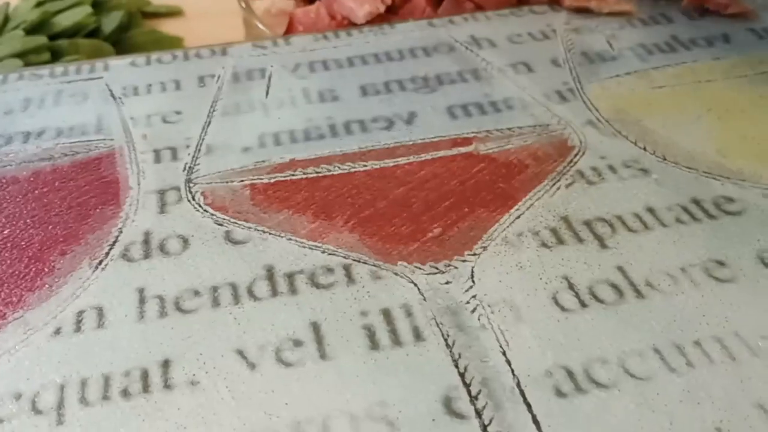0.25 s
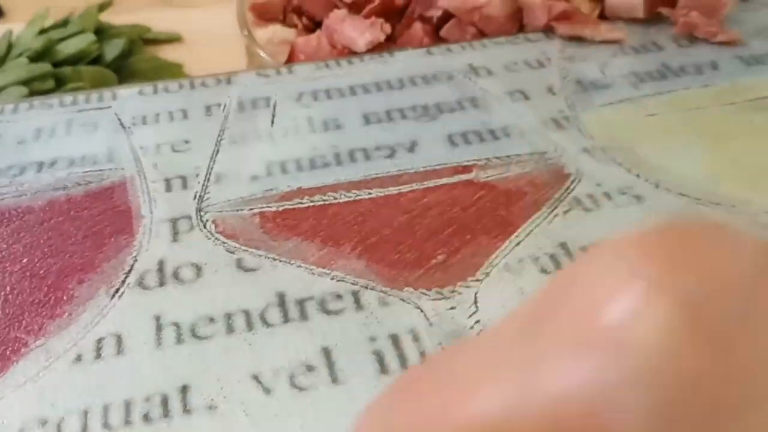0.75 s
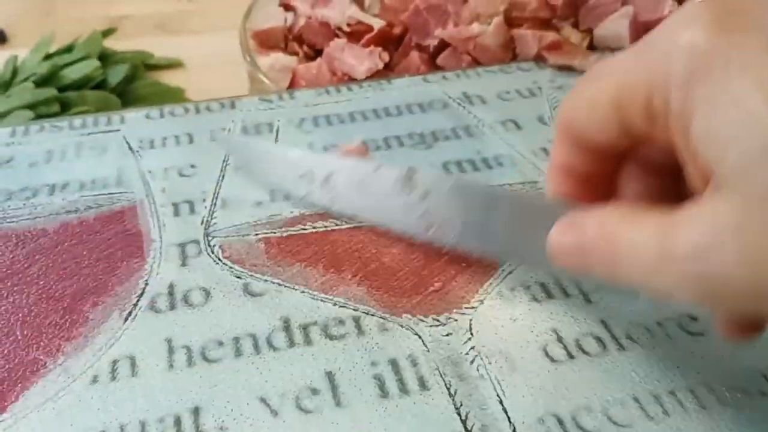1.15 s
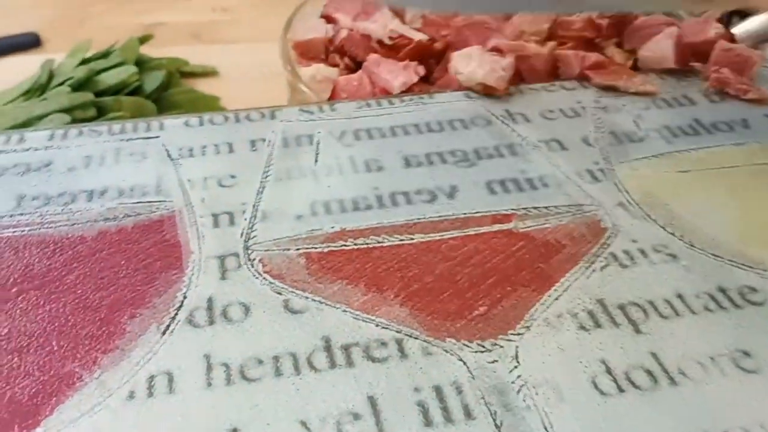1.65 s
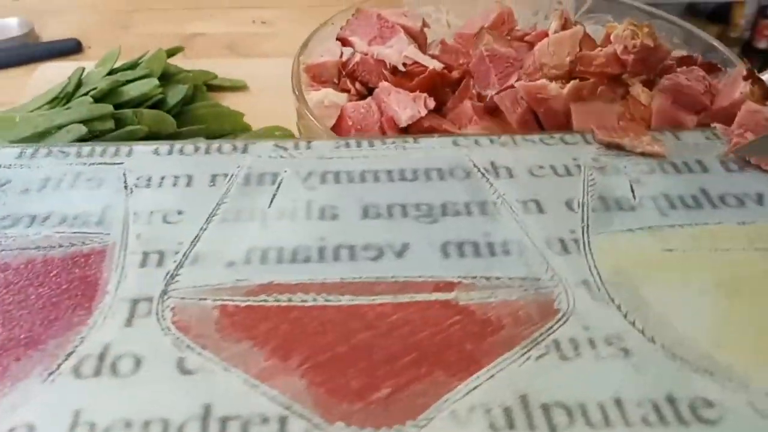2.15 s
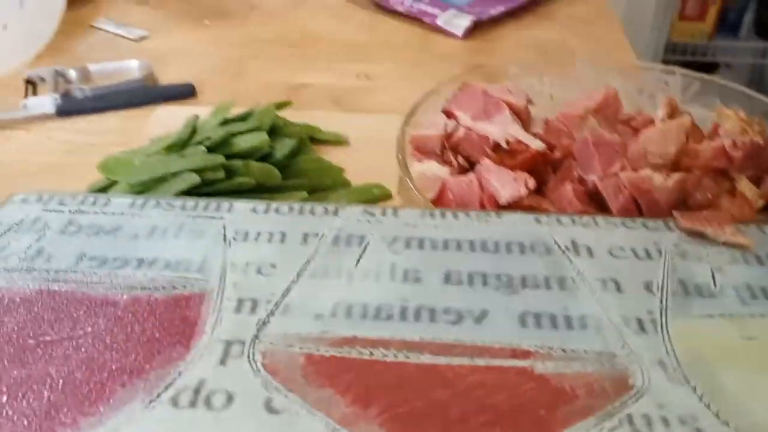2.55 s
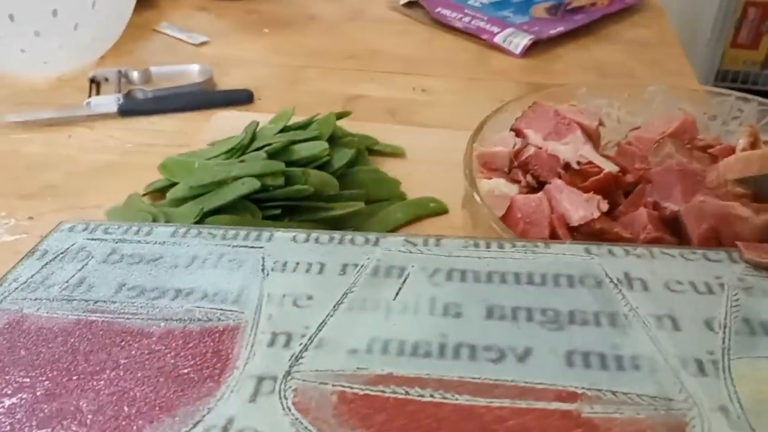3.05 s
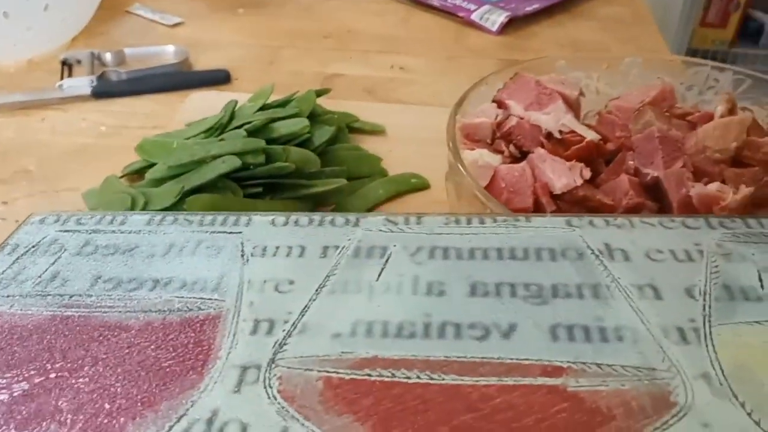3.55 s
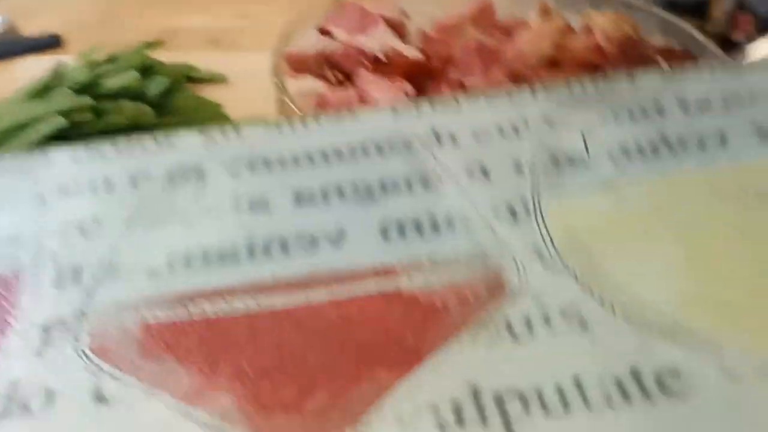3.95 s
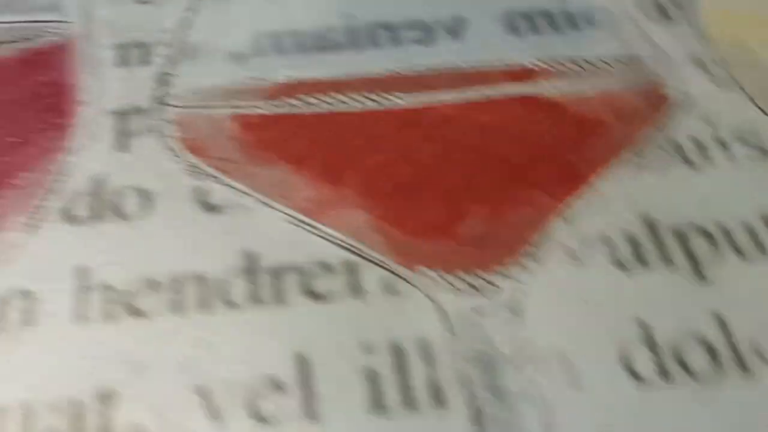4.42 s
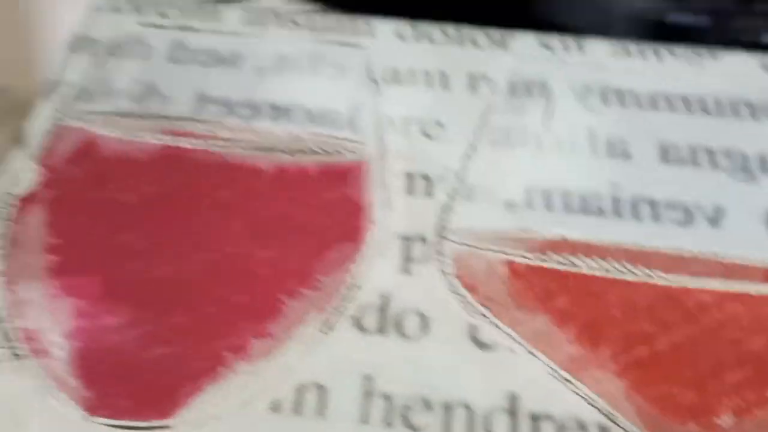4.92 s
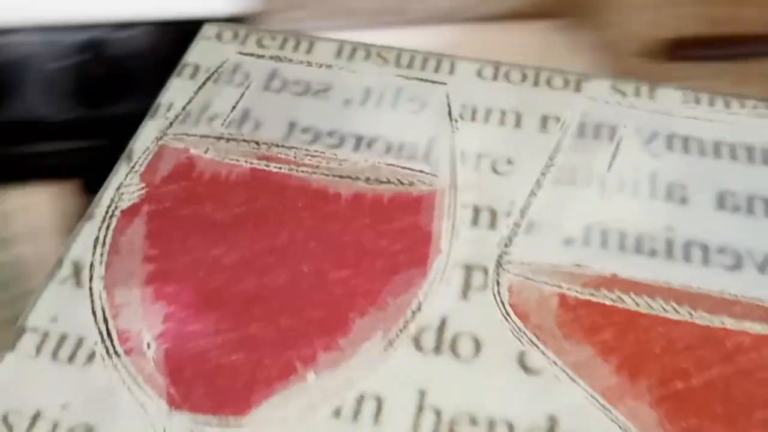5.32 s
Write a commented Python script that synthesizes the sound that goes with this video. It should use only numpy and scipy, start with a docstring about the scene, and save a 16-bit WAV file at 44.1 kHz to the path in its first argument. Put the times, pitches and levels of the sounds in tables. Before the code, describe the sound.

In a quiet kitchen, a knife edge knocks and drags over a bumpy glass cutting board near a phone, ending in a cluster of clicks. After a pause come sharper clattering scrapes and a loud knock, then one last clack. Faint hand rubs and soft hiss remain.

```python
"""A knife blade is dragged over a pebbled glass cutting board, held close to a phone in a quiet kitchen.
Noise bursts at every bump, and short knocks of the edge, drive the glass: a sum of decaying modes and dense noise.
Two faint rubs of the hand follow, made the same way; a mono send into decaying noise gives the brief room answer.
Underneath lie a wavering sine hum, low room rumble and a faint noise hiss that swells as the board is handled.
The phone's two microphone ports hear the board with small lags and level differences."""
import sys
import numpy as np
from scipy import signal
from scipy.fft import rfft, irfft, next_fast_len
from scipy.io import wavfile
from scipy.ndimage import uniform_filter1d, map_coordinates

SR = 44100
rng = np.random.default_rng(int(sys.argv[2]) if len(sys.argv) > 2 else 0)


def write(x):
    x = np.atleast_2d(x).T
    wavfile.write(sys.argv[1], SR, np.round(np.clip(x, -1, 1) * 32767).astype(np.int16))

N = 246078

# Quiet kitchen, breakpoints. Columns: time_s, hiss_db (before a fixed lift), hum_db (before the port gains)
BACKGROUND_LEVELS = [(0.0, -75.5, -80), (0.17, -82.5, -89), (0.37, -77.5, -61.5), (0.46, -83.5, -85),
                     (0.629, -77, -58.5), (0.759, -82.5, -88), (0.888, -79.5, -65.5), (1.95, -79, -73),
                     (2.5, -77, -82), (2.68, -74.5, -85.5), (3.3, -96, -71.5), (3.8, -81, -76.5),
                     (4.2, -96.5, -76), (4.3, -82, -76), (4.56, -85.5, -77), (4.699, -82.5, -68),
                     (4.801, -80, -65), (4.89, -88, -64.5), (5.12, -79, -61.5), (5.19, -84, -77),
                     (5.248, -74, -60), (5.58, -73.5, -57.5)]
# Spectrum of the low room rumble, before scaling to rms 1. Columns: frequency_hz, density_db
RUMBLE_SPECTRUM = [(15, -61.5), (25, -41), (60, -13), (97, -14), (156, -3), (189, -14.5), (220, -7),
                   (327, -10.5), (356, -10), (408, -12), (519, -16.5), (575, -18.5), (1500, -29),
                   (1950, -64.5), (3300, -120)]
# Spectrum of the hiss, before scaling to rms 1. Columns: frequency_hz, density_db
HISS_SPECTRUM = [(710, -30), (1200, -6.5), (1660, -3), (3380, -2), (3930, -4), (4240, -2), (5450, -5.5),
                 (5880, -2.5), (8520, -16.5), (13000, -16), (15000, -9.5), (15700, -8.5), (16200, -28)]
# Left-right likeness of rumble and hiss. Columns: frequency_hz, likeness (1 = same at both ports)
PORT_LIKENESS = [(60, .8), (500, 0.43), (1500, 0), (4000, 0.048)]
# Decay of the room answer. Columns: frequency_hz, t60_s
ROOM_DECAY = [(200, 0.17), (2000, 0.43), (6000, 0.39), (12000, 0.091)]
# Treble fall of the phone microphone. Columns: frequency_hz, gain_db
MICROPHONE_FALL = [(15600, -0.5), (16100, -26), (16800, -30)]
# Path of the blade past the phone. Columns: time_s, right_port_lag_ms, left_minus_right_db
BLADE_PLACE = [(.9, .3, 7.5), (1.1, .12, 3), (1.6, 0.061, -3), (2.7, -.25, 3), (3.3, -.3, 0.5),
               (3.45, -.3, 0), (3.85, .42, 2), (4.5, 0.36, -0.5), (5.5, .42, -0.5)]
# Separate modes of the glass. Columns: frequency_hz, level_db, t60_s (before limiting by the hand)
GLASS_MODES = [(336, -9, 0.14), (434.6, -7, 0.11), (614, -10, 0.23), (696.4, -6.5, 0.54), (795, -13, 0.42),
               (945.3, -10.5, 0.13), (1250, -1, 0.45), (1609, -14.5, 0.1), (2110, -6.5, 0.54),
               (2217, -6.5, 0.12), (2447, -12.5, 0.17), (3070, -11, 0.08), (2745, -5, 0.05),
               (3163, -4, 0.05), (3390, -1, 0.045), (3690, 2.5, 0.3), (4210, 4.5, 0.067),
               (4278, -4.5, 0.36), (4650, -0.5, 0.36), (5046, 1, 0.3), (5300, -2, 0.034), (5764, -1.5, 0.3),
               (5940, 3, 0.036), (6370, -5, 0.15), (6830, -6, .1), (7280, -21, .1), (7590, -12.5, 0.18),
               (9480, -22.5, 0.071), (10350, -31, 0.053), (11220, -27.5, 0.043), (14900, -15, 0.032),
               (15190, -20.5, .05)]
# Longest ring that the holding hand allows. Columns: frequency_hz, t60_s
HAND_DAMPING = [(400, .11), (700, .26), (1300, .24), (1600, .12), (2200, 0.16), (4300, 0.071), (6000, .09),
                (9500, .04)]
# Crowded, quickly damped modes of the glass. Columns: frequency_hz, density_db
CROWDED_MODES = [(150, -52.5), (250, -25.5), (420, -10), (695, -8.5), (1070, -13.5), (1230, -13.5),
                 (1740, -9), (3250, -4.5), (3930, -16), (4280, -4), (5950, -5), (8420, -16), (12800, -25),
                 (14900, -11), (15700, -26.5)]
# Edges in hz between the registers: body, low ring, bright ring, treble, hiss
REGISTER_EDGES_HZ = [0, 1500, 3500, 8000, 13000, 20000]
# Part of the board under each stroke, one row a stroke. Columns: low_ring_db, treble_db (both re bright ring),
# knock_body_db (re body of the rubbing), low_pitch_hz at start, middle, end, high_pitch_hz at start, middle, end
BOARD_SPOTS = [(0.5, -14.5, -10, 720, 570, 940, 2750, 2260, 3300),
               (-1.5, -16.5, -19, 1700, 1200, 1100, 2600, 2500, 2500),
               (2, -13, -14, 820, 770, 300, 1700, 2900, 2550),
               (-4.5, -9.5, -20, 740, 820, 2100, 3000, 3160, 2760),
               (-5, -13, -10, 450, 450, 435, 2480, 2340, 2500),
               (-3.5, -12.5, -13, 445, 550, 310, 2450, 2460, 2340)]
# Knocks and catches of the edge. Columns: start_s, level_db, low_ring_db (re bright ring),
# low_pitch_hz, high_pitch_hz (the two favoured pitches)
EDGE_KNOCKS = [(0.9113, -16.5, -3.5, 720, 2650), (1.4656, -37, -12, 716, 3370),
               (1.481, -11.5, -9.5, 689, 4270), (1.5125, -16, 6.5, 802, 3360),
               (1.5297, -9.5, -22.5, 811, 3285), (1.5404, -16, 6, 797, 3140),
               (1.5486, -19.5, -6.5, 1270, 4280), (1.5588, -14.5, 1.5, 810, 3200),
               (1.5852, -14.5, -2, 1250, 3400), (2.1744, -69, 10, 483, 2300),
               (2.6996, -9, -7.5, 1430, 6230), (2.7557, -21.5, -2.5, 1360, 5840),
               (2.8074, -23.5, -10, 1380, 5800), (2.8449, -9, -11, 1240, 5940),
               (2.8694, -12.5, -10.5, 1270, 4590), (2.8894, -18.5, -21, 1277, 5690),
               (2.9032, -9.5, -22.5, 1320, 5840), (2.9357, -13, -17.5, 1244, 4140),
               (2.9544, -18, -19.5, 690, 4202), (2.9644, -9.5, -20, 1200, 4210),
               (3.0416, -17, -22.5, 1230, 6100), (3.3443, 4, -9, 448, 4310), (3.3584, -10, -17, 1250, 4340),
               (3.3992, -20, -11.5, 1250, 4160), (3.4075, -19, -14, 459, 3690),
               (3.4246, -1, -13.5, 684, 4045), (3.866, -3.5, -11.5, 676, 5426),
               (3.9579, -29.5, -4, 1185, 4930), (4.4664, -59, -3, 401, 3565), (4.6784, -61, 6, 489, 2570),
               (5.4768, -60.5, 10.5, 479, 2700)]
# Strokes of the blade, then two faint rubs of the hand; one list of breakpoints each.
# Columns: time_s, force_db, body_db, edge_hiss_db (the last two re bright ring)
BLADE_STROKES = [
    [(0.918, -29, -1.5, -11), (0.935, -37.5, -5.5, -13), (1.03, -29.5, -10.5, -11.5),
     (1.17, -31.5, -3.5, 0), (1.27, -28.5, -4.5, -14.5), (1.38, -32.5, 1, -21), (1.43, -28, -7.5, -13.5),
     (1.508, -31, -10, -21.5), (1.574, -37.5, 0.5, -29.5)],
    [(2.708, -28.5, -24, -29.5), (2.8, -29, -18.5, -30.5), (2.914, -24.5, -19.5, -24),
     (2.964, -18.5, -19, -22.5), (2.994, -39, -15, -21.5), (3.042, -37.5, -3.5, -25),
     (3.075, -45.5, -8, -19.5)],
    [(3.364, -21.5, -6.5, -24), (3.386, -35, -9.5, -14.5), (3.404, -28.5, -11, -19.5),
     (3.418, -50, -6, -24)],
    [(3.882, -24.5, -8, -18), (3.946, -55, -25.5, -14), (3.96, -17.5, -33, -18), (3.975, -64, -12, -25)],
    [(4.6, -81.5, -15.5, -9), (4.68, -66.5, -23, -13.5), (4.73, -76.5, -33, -7), (4.86, -75.5, -11, -10)],
    [(4.96, -76.5, -17, -12), (5.17, -73, -27, -12), (5.22, -70.5, -10.5, -6.5), (5.31, -78, -23, -10.5),
     (5.39, -62, -37, -12.5), (5.454, -79, -10, -12), (5.49, -70, -10.5, -4), (5.57, -80.5, -10, -13)],
]

HUM_HZ = 160  # centre of the wavering pitch
RUMBLE_DB, RUMBLE_FOLLOWS = -67, 0.14  # mean level; share of the hiss swells that the rumble takes on
HISS_LIFT_DB = 5.0
ROOM_SEND_DB = -14
TOP_HZ = 16800  # band limit of the phone
DETUNE = 0.0067  # the pressing blade shifts each mode by about this share of its pitch
BODY_QUICK_DB = -0.5  # few crowded modes in the lowest register
KNOCK_TREBLE_DB, KNOCK_HISS_DB = -4.5, -8.5  # a knock is duller than the rubbing around it
KNOCK_RISE_S, RATTLE_T60_S = 0.00049, 0.016  # time constant of the rise; decay of the rattle
SCATTER_DB = 1  # typical stray of a knock to the left or right


def amp(db):
    """dB to gain."""
    return 10 ** (np.asarray(db) / 20)


def unit(x):
    """Scaled to rms 1."""
    return x / np.sqrt(np.mean(x ** 2) + 1e-20)


def along(points, hz):
    """Interpolate (frequency_hz, value) points on a log frequency axis."""
    f, v = np.transpose(points)
    return np.interp(np.log(hz + 1), np.log(f + 1), v)


def wobble(rate):
    """A smooth random curve with rate knots a second."""
    knots = rng.standard_normal(int(N * rate / SR) + 4)
    return map_coordinates(knots, [np.arange(N) * rate / SR])


def filtered(x, response):
    """x shaped by a gain that depends on frequency."""
    m = next_fast_len(x.shape[-1] + 8192)
    spectrum = rfft(x, m) * response(np.fft.rfftfreq(m, 1 / SR))
    return irfft(spectrum, m)[..., :x.shape[-1]]


def highpassed(x, order, cutoff_hz):
    """x without the range below cutoff_hz."""
    return signal.sosfilt(signal.butter(order, cutoff_hz, "high", fs=SR, output="sos"), x)


def causal(gain):
    """Minimum-phase impulse response of a gain on the rfft grid."""
    cepstrum = irfft(np.log(gain + 1e-6))
    half = len(cepstrum) // 2
    cepstrum[1:half] *= 2
    cepstrum[half + 1:] = 0
    return irfft(np.exp(rfft(cepstrum)))


def add(out, at, sound):
    """Mix a stereo sound in from sample at."""
    out[:, at:at + sound.shape[1]] += sound


def rush(spectrum):
    """Stereo noise of rms 1 with a given spectrum, most alike at the two ports in the bass."""
    def mid_side(hz):
        angle = np.arccos(np.clip(along(PORT_LIKENESS, hz), -1, 1)) / 2
        return amp(along(spectrum, hz)) * [np.cos(angle), np.sin(angle)]

    mid, side = filtered(rng.standard_normal((2, N)), mid_side)
    return unit(np.array([mid + side, mid - side]))


def hum(hum_db):
    """A sine of wavering pitch and level, in phase at the two ports, a little louder at the left."""
    pitch_hz = HUM_HZ + 11 * wobble(20)
    tone = np.sqrt(2) * np.sin(2 * np.pi * np.cumsum(pitch_hz) / SR)
    return amp(hum_db + 2.2 * wobble(22) + 3 * wobble(2.7)) * tone * amp(0) * np.array(amp([[.4], [-.4]]))


def rumble(hiss_db):
    """Low room noise of unsteady level, which follows the swells of the hiss a little."""
    swell_db = RUMBLE_FOLLOWS * (hiss_db - hiss_db.mean())
    level_db = RUMBLE_DB + swell_db + 2.4 * wobble(14) + 0.58 * wobble(13)
    return amp(level_db) * rush(RUMBLE_SPECTRUM)


def hiss(hiss_db):
    """Shaped noise that swells as the board is handled."""
    return amp(hiss_db + HISS_LIFT_DB + .8 * wobble(32)) * rush(HISS_SPECTRUM)


def background():
    """The quiet kitchen: hum and hiss have level curves of their own, rumble leans on that of the hiss."""
    s, *levels_db = np.transpose(BACKGROUND_LEVELS)
    hiss_db, hum_db = [np.interp(np.arange(N) / SR, s, curve) for curve in levels_db]
    return hum(hum_db) + rumble(hiss_db) + hiss(hiss_db)


def kitchen(x):
    """The room's answer is noise in which each frequency dies at its own speed."""
    hz, t, z = signal.stft(rng.standard_normal((2, SR * 3 // 4)), SR, nperseg=256)
    decay = amp(-60 * t / along(ROOM_DECAY, hz)[:, None])
    tail = signal.istft(z * decay, SR, nperseg=256)[1]
    send = np.pad(x.mean(axis=0), (300, 0))[None]  # the answer comes 300 samples late
    return signal.fftconvolve(send, tail / np.linalg.norm(tail[0]), axes=1)[:, :N]


def ports(length):
    """Noise of rms 1 at the two ports: they agree on the long waves and drift apart in the short ones."""
    shared, other = rng.standard_normal((2, length))
    apart = highpassed(other, 1, 1500)
    return unit(np.array([shared - .45 * apart, shared + .45 * apart]))


def favour_db(hz, low_hz, high_hz):
    """The spot under the blade favours the modes near two pitches."""
    low_peak = 13 / (1 + ((hz / low_hz - 1) / 0.15) ** 2)
    high_peak = 10 / (1 + ((hz / high_hz - 1) / .05) ** 2)
    return low_peak + high_peak


def ringing_modes(t, late, low_hz, high_hz):
    """Decaying sines of the glass, driven unevenly, each shaped (port, mode, time)."""
    hz, db, t60 = np.transpose(GLASS_MODES)[:, :, None]
    t60 = np.clip(t60, .02, along(HAND_DAMPING, hz))
    drive_db = favour_db(hz, low_hz, high_hz) + rng.normal(0, 4.5, db.shape)
    # each mode reaches the two ports from its own part of the plate
    lag = np.maximum([[[-late]], [[late]]], 0) + rng.uniform(0, 0.00026, (2, len(hz), 1))
    turns = 2 * np.pi * hz * (1 + DETUNE * rng.standard_normal(hz.shape)) * (t - lag)
    # a long ring starts lower, so that t60 leaves the energy of a mode alone
    envelope = amp(np.float32(db + drive_db - 10 * np.log10(t60) - 60 * t / t60))
    return hz[:, 0], envelope * np.sin(np.float32(turns)) * (turns > 0)


def board(s, body_db, low_db, treble_db, hiss_db, stray_db, low_hz, high_hz, ring_share):
    """Stereo answer of the glass to a unit blow: ringing and crowded modes, levelled register by register."""
    t = np.arange(SR // 5) / SR
    f = np.fft.rfftfreq(len(t), 1 / SR)
    at, lag_ms, place_db = np.transpose(BLADE_PLACE)
    late = np.interp(s, at, lag_ms) / 1000
    pan_db = stray_db + np.interp(s, at, place_db)
    mode_hz, modes = ringing_modes(t, late, low_hz, high_hz)
    crowd = amp(along(CROWDED_MODES, f) + favour_db(f, low_hz, high_hz))
    ring, quick_gain = np.zeros((2, len(t))), np.zeros(len(f))
    levels_db = [body_db, low_db, 0, treble_db, hiss_db]  # the bright ring is the reference
    for lo, hi, level_db in zip(REGISTER_EDGES_HZ, REGISTER_EDGES_HZ[1:], levels_db):
        part = modes[:, (mode_hz >= lo) & (mode_hz < hi)].sum(axis=1)
        ring += amp(level_db) * unit(highpassed(part, 2, .7 * lo + 100))
        quick_db = level_db + BODY_QUICK_DB * (lo == 0)
        quick_gain += amp(quick_db) * unit(crowd * (f >= lo) * (f < hi))
    thud = causal(uniform_filter1d(quick_gain, size=40))  # the registers blend into each other
    quick = np.array([np.roll(thud, round(max(side * late, 0) * SR)) for side in (-1, 1)])
    share = np.clip(ring_share, 0, 1)
    answer = np.sqrt(share / len(t)) * ring + np.sqrt(1 - share) * quick
    # the blade on glass is kept thin below about 240 Hz
    return highpassed(answer, 4, 240) * amp([[pan_db / 2], [-pan_db / 2]])


def colour(stroke, s):
    """Body, low ring, treble and hiss levels of a stroke at one moment."""
    at, _, body_db, hiss_db = np.transpose(BLADE_STROKES[stroke])
    low_db, treble_db = BOARD_SPOTS[stroke][:2]
    return np.interp(s, at, body_db), low_db, treble_db, np.interp(s, at, hiss_db)


def knocks():
    """Each knock is a fast-rising noise rattle into the glass, coloured like the stroke of nearest middle."""
    out, t = np.zeros((2, N + SR)), np.arange(SR // 25) / SR
    middles = np.array([(rows[0][0] + rows[-1][0]) / 2 for rows in BLADE_STROKES])
    envelope = amp(-60 * t / RATTLE_T60_S) * (1 - np.exp(-t / KNOCK_RISE_S))
    for s, db, low_db, low_hz, high_hz in EDGE_KNOCKS:
        stroke = np.argmin(np.abs(middles - s))
        body_db, _, treble_db, hiss_db = colour(stroke, s)
        spot = board(s, body_db + BOARD_SPOTS[stroke][2], low_db, treble_db + KNOCK_TREBLE_DB,
                     hiss_db + KNOCK_HISS_DB, SCATTER_DB * rng.standard_normal(), low_hz, high_hz,
                     ring_share=0.42)
        blow = ports(len(t)) * envelope
        add(out, round(s * SR), amp(db) * signal.fftconvolve(blow, spot, axes=1))
    return out[:, :N]


def chatter(bumps_per_s, burst_s, steady):
    """Force on the edge: a burst of grit at every bump of the surface, over steady rubbing; rms 1."""
    steps = np.cumsum(bumps_per_s / SR * amp(3 * wobble(40)))  # bumps passed so far, at uneven speed
    bumps = np.diff(steps.astype(int), prepend=0) * amp(3 * rng.standard_normal(N))
    bursts = signal.lfilter([1], [1, -np.exp(-1 / (burst_s * SR))], bumps)
    return unit((steady + unit(bursts)) * ports(N))


def scrape():
    """The blade travels, so the force passes by crossfades from one spot of the board to the next."""
    out, hop = np.zeros((2, N + SR)), SR // 14
    force = chatter(bumps_per_s=135, burst_s=.0016, steady=.45)
    for stroke, rows in enumerate(BLADE_STROKES):
        s, db = np.transpose(rows)[:2]
        n = np.arange(round(s[0] * SR), round(s[-1] * SR))
        push = force[:, n] * amp(np.interp(n / SR, s, db))
        start_middle_end = n[[0, len(n) // 2, -1]]
        low_path_hz, high_path_hz = BOARD_SPOTS[stroke][3:6], BOARD_SPOTS[stroke][6:]
        for centre in range(n[0], n[-1] + hop, hop):
            fade = np.cos(np.pi / 2 * np.clip((n - centre) / hop, -1, 1))
            near = fade > 1e-6
            low_hz = np.interp(centre, start_middle_end, low_path_hz)
            high_hz = np.interp(centre, start_middle_end, high_path_hz)
            spot = board(centre / SR, *colour(stroke, centre / SR), 0, low_hz, high_hz, ring_share=0.75)
            add(out, n[near][0], signal.fftconvolve((push * fade)[:, near], spot, axes=1))
    return out[:, :N]


def scene():
    """Background, the room's answer, and the blade on glass up close."""
    knife = scrape() + knocks()
    room = amp(ROOM_SEND_DB) * kitchen(knife)
    return background() + room + knife


def record(dry):
    """The phone clips softly at full scale and keeps nothing above its band limit."""
    clipped = dry / (1 + np.abs(dry) ** 6) ** (1 / 6)
    return filtered(clipped, lambda hz: amp(along(MICROPHONE_FALL, hz)) * (hz < TOP_HZ))


dry = scene()
out = record(dry)
write(out)
```